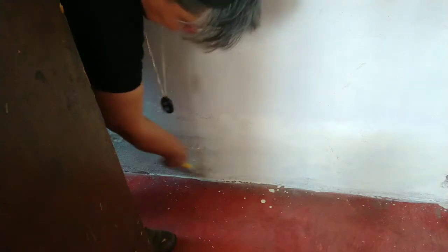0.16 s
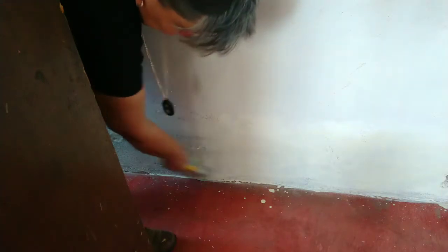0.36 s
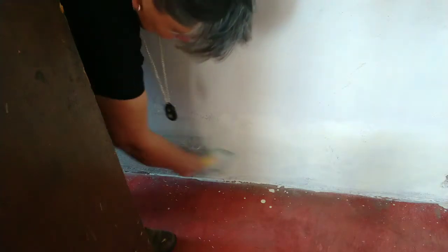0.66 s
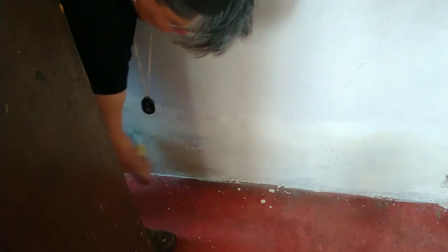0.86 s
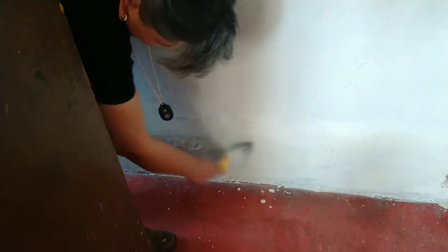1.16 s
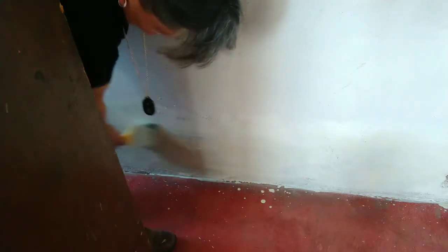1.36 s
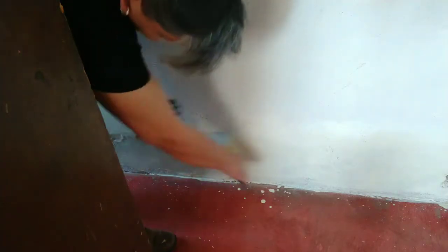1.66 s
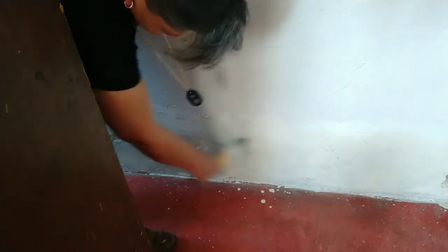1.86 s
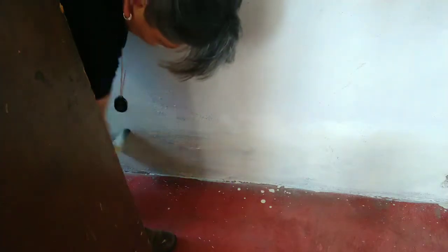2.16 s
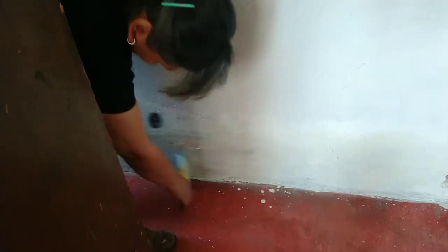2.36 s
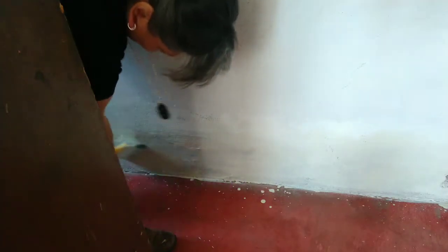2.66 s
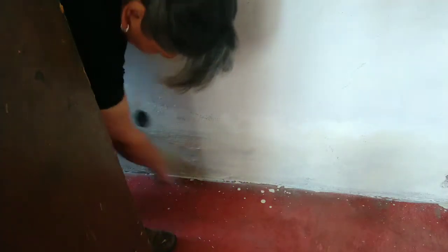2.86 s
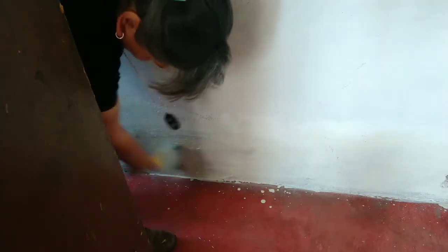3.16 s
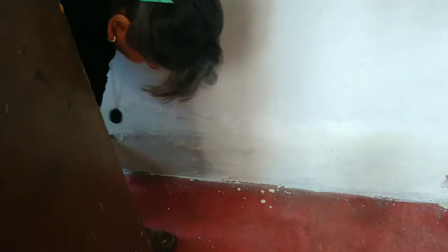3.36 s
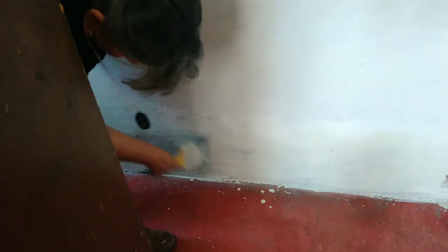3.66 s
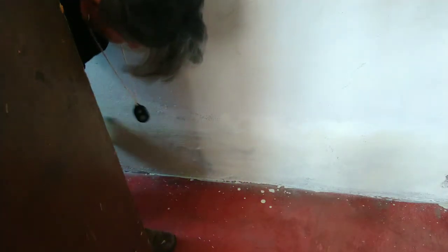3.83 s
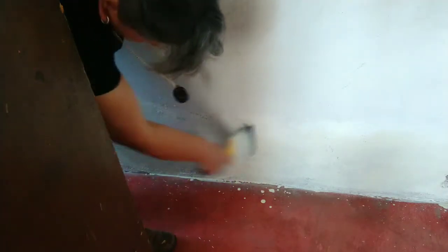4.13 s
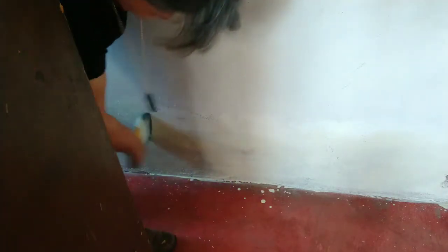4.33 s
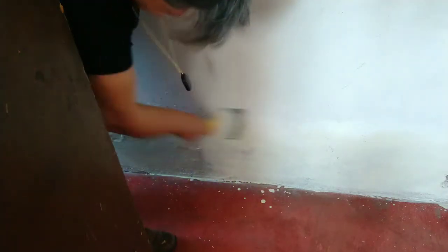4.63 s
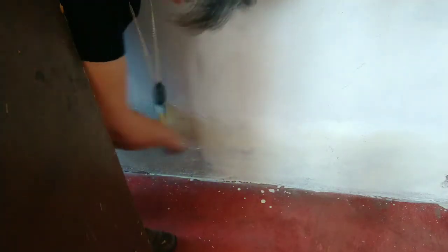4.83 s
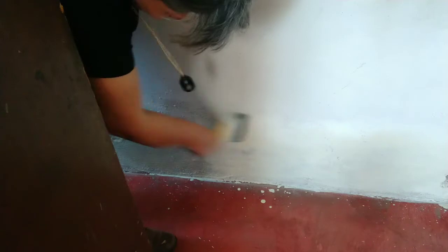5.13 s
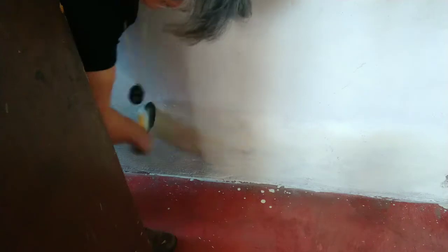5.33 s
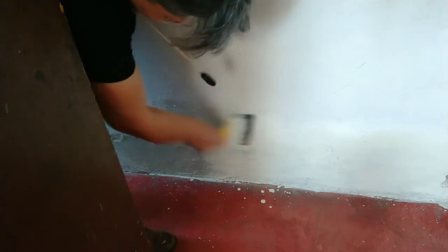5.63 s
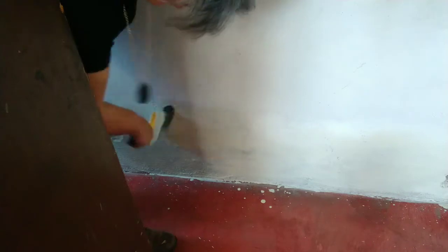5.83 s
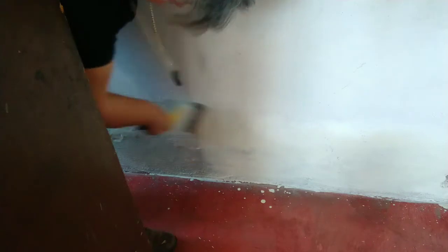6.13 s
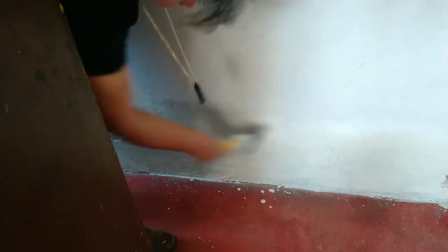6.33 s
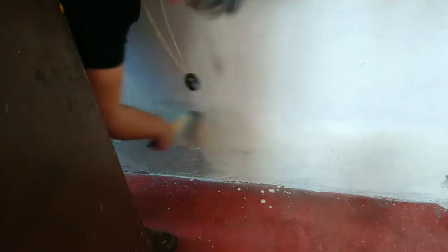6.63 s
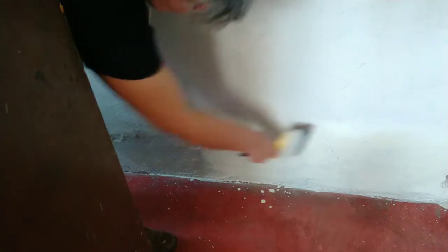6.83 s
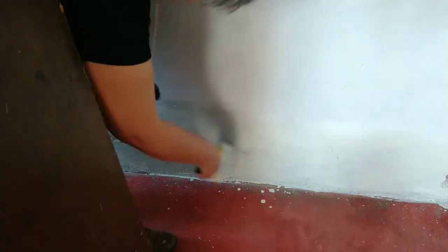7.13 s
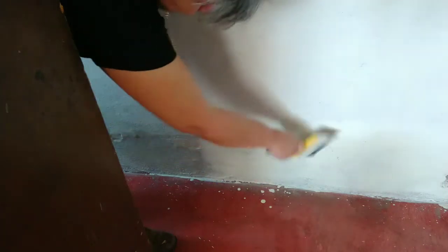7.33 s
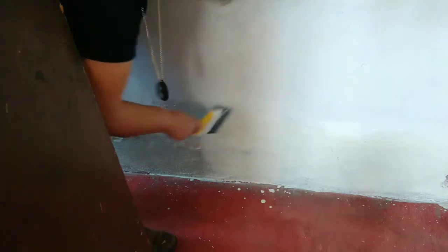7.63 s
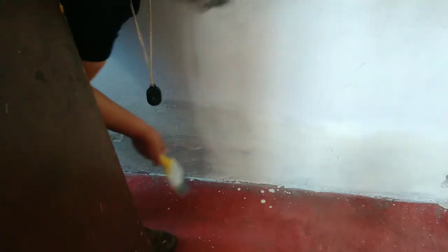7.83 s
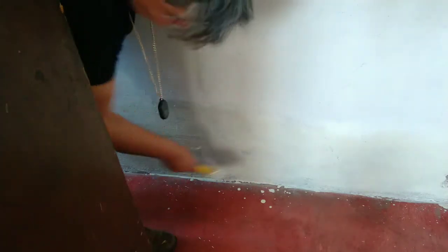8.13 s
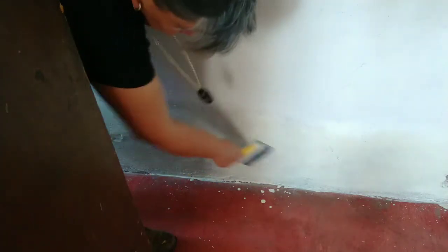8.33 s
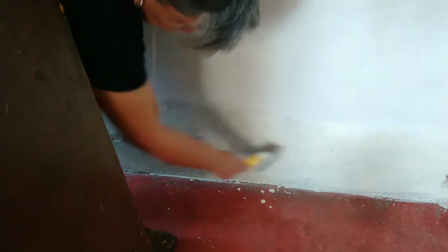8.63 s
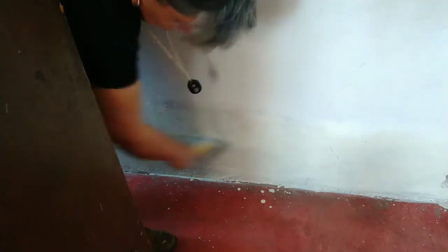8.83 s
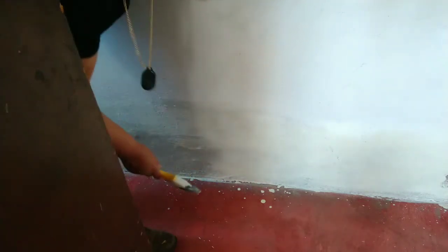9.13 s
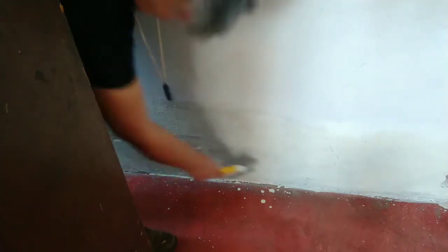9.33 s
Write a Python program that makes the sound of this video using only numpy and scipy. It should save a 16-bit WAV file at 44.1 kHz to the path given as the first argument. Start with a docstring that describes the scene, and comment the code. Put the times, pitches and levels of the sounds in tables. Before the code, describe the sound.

A loaded paintbrush scrubs a plaster wall in quick back-and-forth strokes, hissing and rubbing hollowly, with small ticks, soft thuds and faint bird chirps.

```python
"""At the foot of a plaster wall in a small quiet room, a paintbrush scrubs in quick back-and-forth strokes.
Countless bristle slips make a hiss; the loaded tuft adds a hollow rub whose pitch slides as the tuft folds.
The brush ticks where it lands, knocks twice on wood, and hard pushes give soft low thuds.
Outside, a small bird chirps now and then in buzzy slurs; still air, a low hum and a thin whine lie beneath.
Two microphone ports hear it all, the right one louder."""
import sys
import numpy as np
from scipy import signal
from scipy.fft import rfft, irfft
from scipy.io import wavfile

SR = 44100
rng = np.random.default_rng(int(sys.argv[2]) if len(sys.argv) > 2 else 0)


def dump(signal):
    """Clip the signal to [-1, 1] and save it as 16-bit WAV at the path in sys.argv[1]."""
    limited = np.clip(np.atleast_2d(signal).T, -1, 1)
    pcm = np.round(limited * 32767).astype(np.int16)
    wavfile.write(sys.argv[1], SR, pcm)


N = 418068
TIME, FREQ = np.arange(N) / SR, np.fft.rfftfreq(N, 1 / SR)

# Levels in the tables are those before each layer's trim and the microphone; spectra give only a shape.
# Brush strokes on the wall. Each row: start in seconds, speed-up in s, sweep in s, slow-down in s,
# hiss level in dB, dull scrape relative to the hiss in dB, rub level in dB,
# hardest press in s after the start, rub centre at first in Hz, rub centre at last in Hz.
STROKES = [(0.0, 0.0013, 0.002, 0.058, -51, -13, -71, 0.0, 685, 700.0),
           (0.045, 0.026, 0.079, 0.047, -37.5, -12.5, -45.5, 0.019, 740.0, 570),
           (0.209, 0.068, 0.035, 0.089, -38.5, -7, -56, 0.097, 780, 840),
           (0.358, 0.083, 0.035, 0.044, -39, -8, -43, 0.058, 760, 500),
           (0.538, 0.076, 0.03, 0.068, -35.5, -12, -52.5, 0.041, 803, 790),
           (0.723, 0.011, 0.11, 0.08, -44.0, -8.5, -55, 0.073, 496, 370.0),
           (0.936, 0.035, 0.025, 0.082, -48.5, 1.5, -45.5, 0, 850, 670),
           (1.035, 0.025, 0.099, 0.11, -58.5, -9.5, -56, 0.16, 700.0, 980),
           (1.281, 0.058, 0.094, 0.109, -45.5, -7.5, -51.5, 0.072, 1010, 735),
           (1.647, 0.096, 0.0083, 0.16, -49.5, -9.5, -60, 0.05, 1006, 625),
           (1.951, 0.099, 0.077, 0.089, -47.5, -9.5, -56.5, 0.089, 1140, 650),
           (2.301, 0.067, 0.035, 0.021, -61.5, -9, -62.5, 0, 900.0, 800.0),
           (2.401, 0.01, 0.024, 0.11, -47, -8, -52.5, 0.054, 700.0, 700.0),
           (2.58, 0.013, 0.16, 0.13, -49.0, -8.5, -48.5, 0.034, 597, 418),
           (2.876, 0.037, 0.052, 0.049, -55.5, -7.5, -67, 0.057, 600, 595),
           (2.952, 0.062, 0.037, 0.13, -45.5, -12.0, -53.5, 0.12, 556, 690),
           (3.167, 0.074, 0.11, 0.17, -49.5, -10, -53.5, 0.16, 405, 465),
           (3.516, 0.054, 0.043, 0.051, -56.0, -10, -54, 0.0, 494, 460),
           (3.612, 0.022, 0.01, 0.07, -47.5, -10.5, -56, 0.063, 520.0, 594),
           (3.74, 0.012, 0.096, 0.16, -45.5, -4.5, -51.5, 0.11, 350.0, 640),
           (3.99, 0.095, 0.045, 0.069, -44.0, -7.5, -48, 0.078, 725, 714),
           (4.231, 0.015, 0.055, 0.17, -45, -8, -49, 0.0077, 654, 440),
           (4.439, 0.12, 0.022, 0.056, -45.0, -4.5, -46, 0.023, 905, 700.0),
           (4.653, 0.049, 0.11, 0.14, -42.0, -5, -42.5, 0.1, 730, 535),
           (4.907, 0.064, 0.11, 0.12, -45.5, -6.5, -53, 0.1, 716, 706),
           (5.186, 0.027, 0.12, 0.2, -44.0, -5.0, -42.5, 0.23, 548, 940),
           (5.442, 0.11, 0.057, 0.048, -40.5, -12.5, -51, 0.15, 860.0, 870),
           (5.689, 0.048, 0.14, 0.098, -42.0, -9, -46, 0.072, 383, 724),
           (6.092, 0.084, 0.066, 0.08, -41.5, -8, -47.5, 0.086, 810, 760.0),
           (6.515, 0.13, 0.031, 0.093, -38.5, -6.0, -41, 0.097, 1100.0, 440),
           (6.984, 0.051, 0.051, 0.069, -42, -6, -44, 0.051, 1050, 493),
           (7.438, 0.13, 0.11, 0.061, -44.5, -6.5, -44, 0.12, 907, 723),
           (8.312, 0.17, 0.019, 0.063, -42.5, -6.5, -47.5, 0.12, 892, 470.0),
           (8.678, 0.012, 0.0085, 0.12, -75.5, 14, -57, 0, 1100, 1000.0),
           (8.782, 0.08, 0.071, 0.079, -39.0, -8, -44, 0.057, 973, 418)]
# Hard pushes against the wall. Each row: start in seconds, level in dB, final pitch in Hz, decay time in s.
THUDS = [(.731, -40, 300, 0.016), (0.837, -48.5, 305, .018), (0.942, -59, 97, 0.037),
         (1.713, -64, 286, 0.028), (2.589, -50, 292, 0.026), (3.745, -39.5, 215, .017),
         (4.234, -51.5, 137, 0.038), (4.4, -51.5, 110, 0.053), (4.75, -47.5, 154, 0.055),
         (4.987, -58.5, 190, 0.025), (5.216, -46.5, 152, .041), (5.577, -55.5, 137, 0.045),
         (5.733, -47.5, 147, 0.057), (6.622, -43.5, 144, 0.052), (6.53, -51.5, 250, 0.018),
         (6.95, -48, 164, 0.024), (7.101, -49, 173, 0.039), (7.948, -53.5, 185, 0.04),
         (8.199, -61, 120, .053), (8.472, -45, 156, .017), (8.656, -58, 146, 0.046),
         (8.911, -38.5, 143, 0.014), (9.382, -69, 130, 0.035)]
# The brush touches down; the row at 4.927 s is instead a sharp click at the start of a chirp. # Each row: start
# in seconds, level in dB, sharp edge relative to it in dB, decay time in s.
TICKS = [(0.734, -41.5, 5.5, 0.0076), (0.949, -52, -9, 0.021), (1.291, -43, -10, 0.0046),
         (1.719, -44.5, 2, 0.0087), (3.330, -46.5, -10, 0.0087), (3.687, -30.5, -23, 0.0022),
         (4.204, -38, -18, 0.011), (4.452, -50, -22, .012), (4.606, -39, -22, 0.0039),
         (4.668, -45, 4, 0.011), (4.927, -46, -4.5, 0.0042), (5.066, -47.5, 15, 0.0051),
         (5.2, -47, -16, 0.0073), (5.391, -38, -22, 0.0032), (5.638, -36.5, -17, 0.0038),
         (5.697, -43.5, -5, 0.0052), (6.351, -45.5, 6.5, 0.0053), (6.4728, -29, 3, 0.0025),
         (6.959, -52, 2.5, 0.0082), (7.44, -62, -6, 0.0079), (8.282, -60.5, 15.5, 0.0093),
         (8.691, -54, -4.5, 0.0043), (8.789, -42, -21.5, 0.0044)]
# The handle knocks on wood. Each row: start in seconds, level in dB, lowest pitch excited in Hz,
# clatter time in s.
KNOCKS = [(2.409, -34.5, 262, 0.046), (2.515, -41.5, 714, 0.045)]
# A small bird chirps outside. Each row: start in seconds, level in dB.
CHIRPS = [(.803, -55), (2.205, -58.5), (3.91, -56.5), (4.912, -52.5), (6.275, -55.5), (8.063, -57),
          (9.277, -59)]
# The cluster of slurs in every chirp. Each row: delay in seconds, length in s, first pitch in Hz,
# last pitch in Hz, level relative to the chirp in dB.
CHIRP_SLURS = [(0.00025, 0.081, 4500, 3250, 1.5), (.005, 0.045, 4700, 4300, -3),
               (.045, .06, 2750, 2450, -14), (0, 0.13, 5700, 5650, -21.5)]

# Spectrum of the bristle hiss. Each row: frequency in Hz, density in dB per Hz.
HISS_SPECTRUM = [(300, -28.5), (900, -62), (1800, -5), (2400, -3), (3100, -2.5), (4500, -1.5), (6600, -2),
                 (7100, -1.5), (10000, -0.5), (15500, -2.5)]
# Spectrum of the duller scrape of dragging bristles. Each row: frequency in Hz, density in dB per Hz.
DRAG_SPECTRUM = [(300, -31.5), (1000, -4.5), (1500, 1), (2000, -6.5), (3000, -1.5), (4500, -2), (6500, -3),
                 (9000, -13), (15000, -36)]
# Spectrum of the broad part of the tuft's rub. Each row: frequency in Hz, density in dB per Hz.
RUB_SPECTRUM = [(100, -32), (300, 10.5), (600, -0.5), (780, 5), (920, 1.5), (1150, 1.5), (1600, 2.5),
                (2500, -1), (5000, -5.5), (12000, -51)]
# Spectrum of the sharp edge of ticks and knocks. Each row: frequency in Hz, density in dB per Hz.
EDGE_SPECTRUM = [(300, -22.5), (1000, -20.5), (3000, 14.5), (6000, 17), (8500, 16), (11000, 9.5),
                 (16000, 17.5)]
# Spectrum of the still air. Each row: frequency in Hz, density in dB per Hz.
AIR_SPECTRUM = [(25, -14), (60, -4), (90, 0), (150, -7), (300, -14), (700, -15), (1500, -21), (4000, -23),
                (9000, -26), (16000, -29)]

# The corner colours the rub. Each row: centre in Hz, width in Hz, gain in dB.
CORNER_MODES = [(606, 31, 4.5), (685, 23, -14.5), (773, 20, 0.5), (942, 25, -8), (1076, 70, 2.5),
                (1221, 68, 3)]
# Broad resonances of wall and corner. Each row: centre in Hz, width in Hz, gain in dB.
WALL_MODES = [(82, 30, -1), (114, 13, 4), (150, 16, -8), (187, 16, 1), (290, 35, -14)]
# What the brush head rings with. Each row: centre in Hz, width in Hz, relative gain in dB.
HEAD_MODES = [(1274, 390, 19.5), (1980, 890, 5), (3870, 370, 2.5)]
# What the wood rings with. Each row: centre in Hz, width in Hz, relative gain in dB.
WOOD_MODES = [(294, 48, 9.5), (529, 120, 2.5), (768, 180, 10), (1033, 64, 9), (1389, 200, -26),
              (3200, 200, 8.5)]

# Steady hum in the room. Each row: frequency in Hz, level in dB.
HUM = [(86.1, -84.5), (172.3, -90.5)]
# A thin whine that drifts. Each row: time in seconds, pitch in Hz.
WHINE_DRIFT = [(0, 8400), (1.9, 8250), (2.3, 8500), (6.05, 8450), (6.9, 8160), (8.1, 8050), (9.1, 7900),
               (9.48, 8400)]
# Ring of the room. Each row: frequency in Hz, time to die by 60 dB in s.
ROOM_DECAY = [(120, 0.34), (500, 0.13), (1500, 0.38), (4000, 0.34), (8000, 0.15), (15000, 0.022)]
# The two microphone ports. Each row: frequency in Hz, likeness from 0 to 1, left lead in radians,
# left minus right level in dB.
PORTS = [(100, .97, 0, -1.9), (300, .9, -.15, -2.3), (750, .84, -.4, -2.1), (1300, .52, -.85, -3.9),
         (2500, .36, -1.1, -4.4), (5500, .26, -1.7, -4.5), (6750, .26, -1.5, -4.5), (7050, .88, 0, -5.3),
         (15000, .88, 0, -7)]

# A stroke lands over LAND_S just before its start, swells as it speeds up, sags once up to speed,
# and loses FADE_DB in its slow-down time.
LAND_S, SWELL_DB, SAG_DB_PER_S, FADE_DB, FADE_CURVE = 0.0056, 21, 15, 22, 1.03
# The rub follows this share (in dB) of the hiss's swell, and eases off either side of the hardest press.
RUB_FOLLOWS, EASE_DB_PER_S = 0.46, 77.5
# The tuft folds around FOLD_LAG_S after the hardest press; FOLD_S sets how gradually the rub's pitch moves.
FOLD_LAG_S, FOLD_S = 0.021, 0.025
THUD_START_RATIO = 2.35  # each push starts this many times above its final pitch
SLUR_FALL_S = .017  # time constant of a slur settling on its last pitch
CUTOFF_HZ = 15820  # the microphone's band limit


def stroke_controls():
    """Each stroke speeds up, sweeps and slows; returns hiss dB, dull scrape dB, rub dB and rub centre Hz."""
    clock = TIME[::32]  # a coarse clock is enough for hand movements
    columns = np.transpose(STROKES)[:, :, None]
    start, rise, sweep, fall, hiss_db, dull_db, rub_db, press, first_hz, last_hz = columns
    t = clock - start
    swell = -SWELL_DB * np.maximum(1 - t / rise, 0) ** 2
    sag = -SAG_DB_PER_S * np.maximum(t - rise, 0)
    fade = -FADE_DB * (np.maximum(t - rise - sweep, 0) / fall) ** FADE_CURVE
    speed_db = swell + sag + fade
    contact = np.clip(1 + t / LAND_S, 0, 1)
    ease_db = EASE_DB_PER_S * abs(t - press)
    hiss_power = contact * amp(hiss_db + speed_db) ** 2 + 1e-20
    rub_power = contact * amp(rub_db + RUB_FOLLOWS * speed_db - ease_db) ** 2 + 1e-20
    folded = (1 + np.tanh((t - press - FOLD_LAG_S) / FOLD_S)) / 2
    rub_hz = first_hz * (last_hz / first_hz) ** folded
    # strokes add in power; dullness and pitch are averages weighted by each stroke's power
    hiss_total, rub_total = hiss_power.sum(0), rub_power.sum(0)
    controls = (10 * np.log10(hiss_total), (hiss_power * dull_db).sum(0) / hiss_total,
                10 * np.log10(rub_total), (rub_power * rub_hz).sum(0) / rub_total)
    return [np.interp(TIME, clock, c) for c in controls]


def slips(per_s, spread_db, share):
    """Stick and slip: a dense bed of tiny slips, with sparse larger snaps on the grit as a share of the power."""
    struck = rng.random((2, N)) < per_s / SR
    sign = rng.choice([-1, 1], (2, N))
    size = amp(spread_db * np.minimum(rng.exponential(1, (2, N)), 4))
    snaps = unit(struck * sign * size)
    share = np.clip(share, 0, 1)
    return np.sqrt(1 - share) * rng.standard_normal((2, N)) + np.sqrt(share) * snaps


def patchy(x, depth_db, width_hz, length_s):
    """Groups of bristles catch and let go, so narrow bands swell and fade; the result has rms 1."""
    f, t, z = signal.stft(x, SR, nperseg=512)
    field = rng.standard_normal(z.shape[1:])
    # smooth the random field along frequency, then along time
    for axis, span in enumerate([width_hz / f[1], length_s / t[1]]):
        offsets = np.arange(-40, 41)
        bell = np.exp(-(2 * offsets / span) ** 2)
        field = signal.fftconvolve(field, np.expand_dims(bell, 1 - axis), "same", axes=axis)
    swollen = z * amp(depth_db * unit(field))
    return unit(signal.istft(swollen, SR, nperseg=512)[1][:, :N])


def bristles(level_db, drag_db, gain_db=-1, judder_db=1.5, judder_hz=70, drag_patch_db=3.0):
    """Hiss that follows the stroke; slow or flat dragging sounds duller than a fast sweep."""
    hiss = colour(slips(per_s=4100, spread_db=4.0, share=0.26), HISS_SPECTRUM)
    hiss = patchy(hiss, depth_db=1.9, width_hz=400, length_s=.035)
    drag = colour(slips(per_s=1100, spread_db=3.0, share=0.21), DRAG_SPECTRUM)
    drag = patchy(drag, depth_db=drag_patch_db, width_hz=480, length_s=0.057)
    slow_db = .88 * level_db + .12 * level_db.max()  # the drag swells and fades less than the hiss
    scrape = hiss * amp(level_db + gain_db) + drag * amp(slow_db + drag_db)
    scrape = scrape * amp(judder_db * wander(judder_hz))
    return butter(scrape, 2, 280, "high")  # thin bristles radiate no bass


def tuft(level_db, hz, gain_db=-2, hollow_db=1, hollow_width=340, edge=0.47, judder_db=2.12, corner_db=-3):
    """The wet tuft rubs: a hollow resonance that moves with pressure, with little below it."""
    broad = unit(colour(slips(per_s=1200, spread_db=4.0, share=0.46), RUB_SPECTRUM))
    hollow = unit(resonate_twice(rng.standard_normal((2, N)), hz, hollow_width))
    f, t, z = signal.stft(broad + amp(hollow_db) * hollow, SR, nperseg=512)
    low_edge_hz = edge * np.interp(t, TIME, hz)  # the low cut moves with the resonance
    z = z / np.sqrt(1 + (low_edge_hz / (f[:, None] + 1)) ** 8)
    rub = signal.istft(z, SR, nperseg=512)[1][:, :N]
    rub = rub + amp(corner_db) * resound(rub, CORNER_MODES)
    rub = patchy(rub, depth_db=4.5, width_hz=52, length_s=0.033)
    return rub * amp(level_db + gain_db + judder_db * wander(48))


def thuds(sink_s=0.012, width=160, wall_db=5, direct_db=-5, low_share=0.38):
    """The tuft judders as it folds over; the pitch sinks and the wall booms."""
    out, t = np.zeros((2, N)), np.arange(SR // 3) / SR
    for s, db, end_hz, decay in THUDS:
        hz = end_hz * (1 + (THUD_START_RATIO - 1) * np.exp(-t / sink_s))
        judder = resonate_twice(rng.standard_normal((2, len(t))), hz, width)
        judder = butter(judder, 3, low_share * end_hz, "high")
        shape = (1 - np.exp(-t / .005)) * np.exp(-(t / decay) ** 2 / 2)
        push = judder * shape
        # every push carries the energy of its shape
        push = push * np.linalg.norm(shape) / np.linalg.norm(push, axis=1, keepdims=True)
        add(out, s, amp(db) * push)
    return amp(direct_db) * out + amp(wall_db) * resound(out, WALL_MODES)


def ticks():
    """Bristles slap down in a short noise burst that rings the brush head, with a sharp edge."""
    blows, edges, t = np.zeros((2, N)), np.zeros((2, N)), np.arange(SR // 16) / SR
    for s, db, edge_db, decay in TICKS:
        shape = np.exp(-t / decay) * (1 - np.exp(-t / 0.00072))
        burst = amp(db) * rng.standard_normal((2, len(t))) * shape
        add(blows, s, burst)
        add(edges, s, amp(edge_db) * burst)
    return ring(butter(blows, 2, 700, "high"), HEAD_MODES) + colour(edges, EDGE_SPECTRUM)


def knocks(clatter_db=-3, edge_db=-16):
    """One hard blow, then a brief clatter, rings the wood."""
    out, t = np.zeros((2, N)), np.arange(SR // 6) / SR
    for s, db, low_hz, clatter in KNOCKS:
        force = amp(clatter_db) * rng.standard_normal((2, len(t))) * np.exp(-(t / clatter) ** 2 / 2)
        force[:, 0] += 24  # the blow itself
        add(out, s, amp(db) * butter(force, 2, low_hz, "high"))
    body = butter(ring(out, WOOD_MODES), 2, 1700, "low")
    return body + amp(edge_db) * colour(out, EDGE_SPECTRUM)


def room(x):
    """Dense reflections from close walls, each band dying at its own speed."""
    taps = rng.standard_normal((2, SR // 2)) * (rng.random((2, SR // 2)) < 3000 / SR)  # 3000 per second
    taps[:, :SR // 300] = 0  # the nearest reflection takes about 3 ms
    hz, t, z = signal.stft(taps, SR, nperseg=256)
    t60 = read(ROOM_DECAY, hz)[:, None]
    tail = signal.istft(z * amp(-60 * t / t60) / np.sqrt(t60), SR, nperseg=256)[1]
    return reverberate(x, tail)


def bird(buzz_hz=310, buzz_depth_hz=260, rough_hz=200, echo_db=-4, echo_t60=0.35):
    """Buzzy whistles slur down and steady, their buzz halving on the way; the yard echoes them."""
    out = np.zeros((2, N))
    rough = rough_hz * wander(700)
    for s, db in CHIRPS:
        for delay, length, first_hz, last_hz, slur_db in CHIRP_SLURS:
            t = np.arange(round(length * SR)) / SR
            buzz = buzz_depth_hz * np.sin(2 * np.pi * buzz_hz * t) + rough[round(s * SR):][:len(t)]
            slur = last_hz + (first_hz - last_hz) * np.exp(-t / SLUR_FALL_S)
            hz = slur + buzz * (1 - t / length / 2)
            whistle = np.sin(np.pi * t / length) * np.sin(2 * np.pi * np.cumsum(hz) / SR)
            add(out, s + delay, amp(db + slur_db) * unit(whistle)[None])
    tail = rng.standard_normal((2, SR // 2)) * amp(-60 * TIME[:SR // 2] / echo_t60)
    return .5 * out + amp(echo_db) * reverberate(out, tail)


def background(air_db=-82, whine_db=-89, whine_width=70):
    """Still air as shaped noise, a low hum of sines, and a thin whine of narrow noise."""
    air = unit(colour(rng.standard_normal((2, N)), AIR_SPECTRUM))
    hum = sum(np.sqrt(2) * amp(db) * np.sin(2 * np.pi * (hz * TIME + rng.random())) for hz, db in HUM)
    whine_hz = np.interp(TIME, *np.transpose(WHINE_DRIFT))
    whine = unit(resonate_twice(rng.standard_normal((2, N)), whine_hz, whine_width))
    return amp(air_db) * air + hum + amp(whine_db) * whine


def amp(db):
    """Decibels to gain."""
    return 10 ** (np.asarray(db) / 20)


def unit(x):
    """Scales to rms 1."""
    return x / np.sqrt(np.mean(x ** 2) + 1e-20)


def read(rows, hz, axis=1):
    """One column of a table, on a log-frequency axis."""
    table = np.transpose(rows)
    return np.interp(np.log(hz + 1), np.log(table[0] + 1), table[axis])


def add(mix, s, sound):
    """Mixes a sound in at time s, cut off where the mix ends."""
    part = mix[:, round(s * SR):][:, :sound.shape[1]]
    part += sound[:, :part.shape[1]]


def butter(x, order, hz, kind):
    """A Butterworth low or high pass."""
    return signal.sosfilt(signal.butter(order, hz, kind, fs=SR, output="sos"), x)


def colour(x, spectrum):
    """Gives x a spectrum; white noise keeps its power."""
    return irfft(rfft(x) * unit(amp(read(spectrum, FREQ))), N)


def wander(rate_hz):
    """A smooth random curve of rms 1."""
    return unit(irfft(rfft(rng.standard_normal(N)) * np.exp(-(FREQ / rate_hz) ** 2), N))


def resonate(x, hz, width):
    """A resonance of gain 1 whose centre may move: x is turned down to 0 Hz, smoothed and turned back."""
    turn = np.exp(2j * np.pi * np.cumsum(hz * np.ones(x.shape[1])) / SR)
    r = np.exp(-np.pi * width / SR)
    return 2 * (turn * signal.lfilter([1 - r], [1, -r], x / turn + 1e-18)).real


def resonate_twice(x, hz, width):
    """Two equal resonances in a row, for steeper skirts."""
    return resonate(resonate(x, hz, width), hz, width)


def resound(x, modes):
    """Passes x through a set of fixed modes, each with its own gain at its peak."""
    click = signal.unit_impulse(4096)[None]
    response = sum(amp(db) * resonate(click, hz, width) for hz, width, db in modes)
    return signal.oaconvolve(x, response, axes=1)[:, :x.shape[1]]


def ring(x, modes):
    """The same, scaled so that white noise keeps its power."""
    return resound(x, modes) / np.linalg.norm(resound(signal.unit_impulse(4096)[None], modes))


def reverberate(x, tail):
    """Convolves x with a tail scaled to unit energy in each channel."""
    return signal.fftconvolve(x, tail / np.linalg.norm(tail, axis=1, keepdims=True), axes=1)[:, :N]


def scene(hiss_room_db=-12, rub_room_db=-9, hit_room_db=-8):
    """Brush strokes and blows, each with its share of the room; a bird outside."""
    hiss_db, dull_db, rub_db, rub_hz = stroke_controls()
    hiss = bristles(hiss_db, dull_db)
    rub = tuft(rub_db, rub_hz)
    hits = thuds() + ticks() + knocks()
    send = amp(hiss_room_db) * hiss + amp(rub_room_db) * rub + amp(hit_room_db) * hits
    reflections = room(send[::-1])  # swapped channels keep the reflections independent of the direct sound
    return hiss + rub + hits + reflections + bird() + background()


def record(dry):
    """Two ports hear alike in bass and top treble, the right one louder; then the band limit."""
    first, second = rfft(dry)
    same = np.clip(read(PORTS, FREQ, axis=1), 0, 1)
    lead = read(PORTS, FREQ, axis=2)
    tilt = amp(read(PORTS, FREQ, axis=3) / 2)  # half the level difference on each side
    left = (same * first + np.sqrt(1 - same ** 2) * second) * np.exp(1j * lead)
    pair = irfft(np.array([left * tilt, first / tilt]), N)
    band_limit = signal.firwin(511, CUTOFF_HZ, window=("kaiser", 9), fs=SR)
    return signal.oaconvolve(pair, band_limit[None], "same")


dry = scene()
out = record(dry)
dump(out)
```